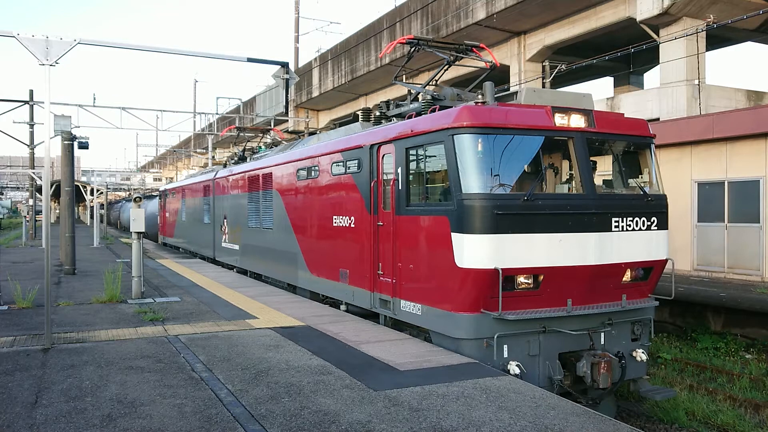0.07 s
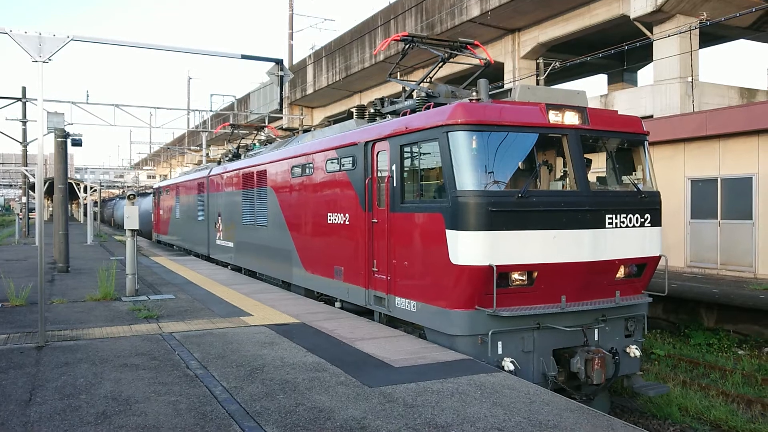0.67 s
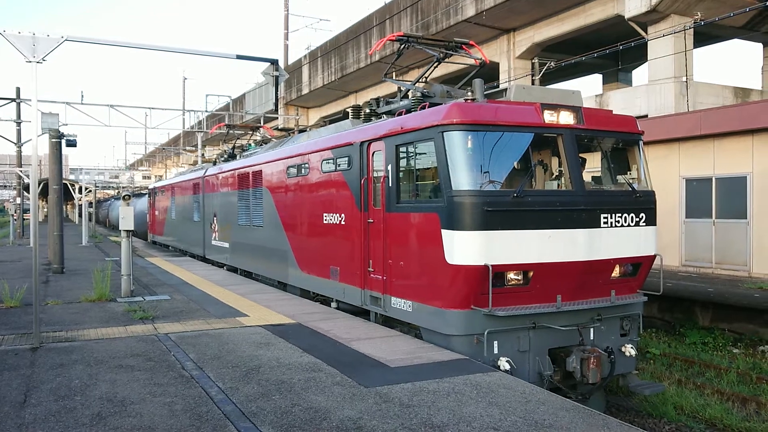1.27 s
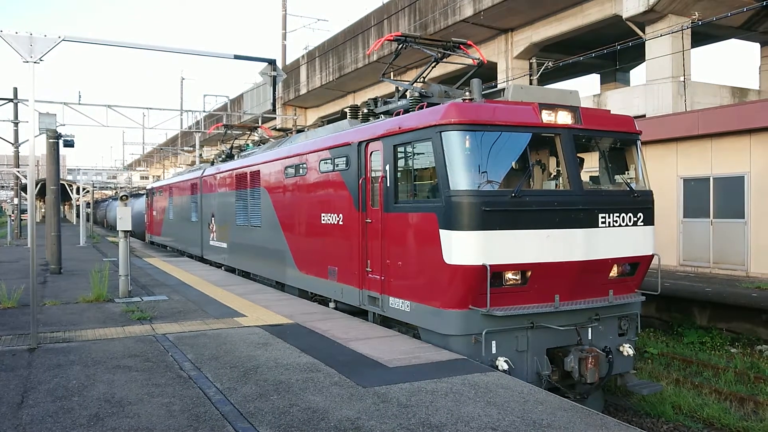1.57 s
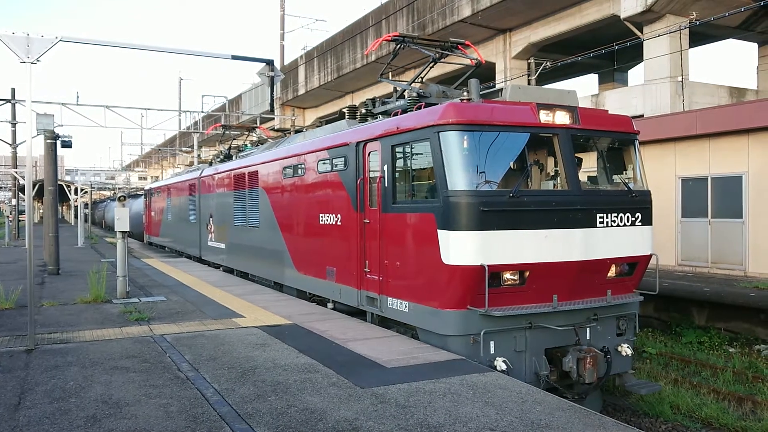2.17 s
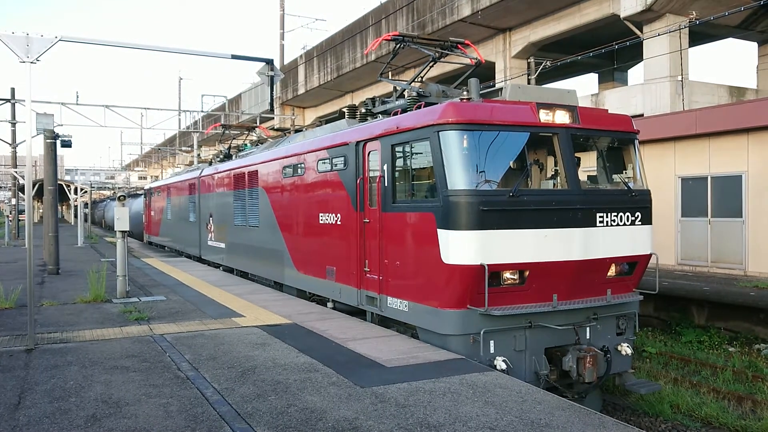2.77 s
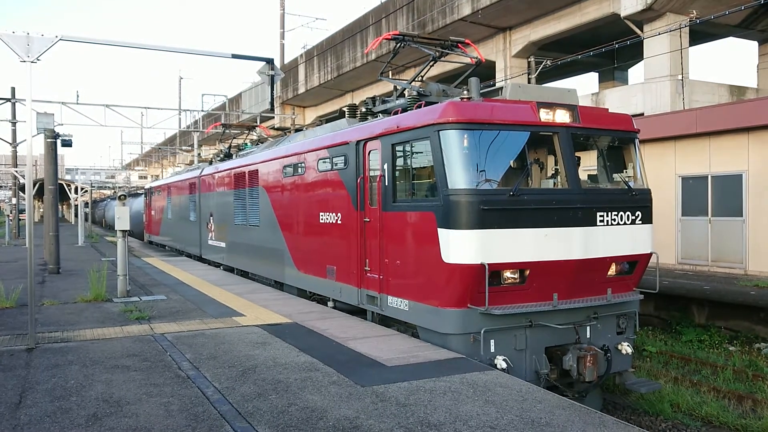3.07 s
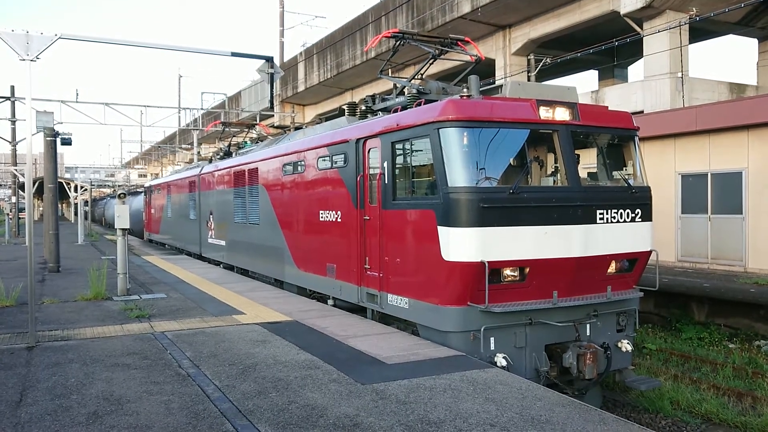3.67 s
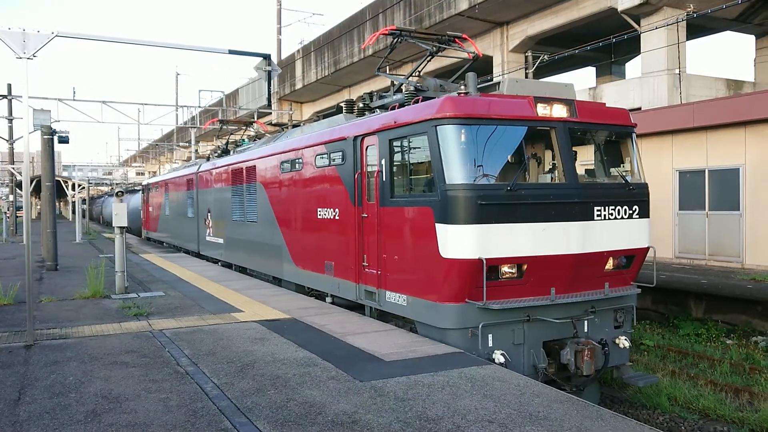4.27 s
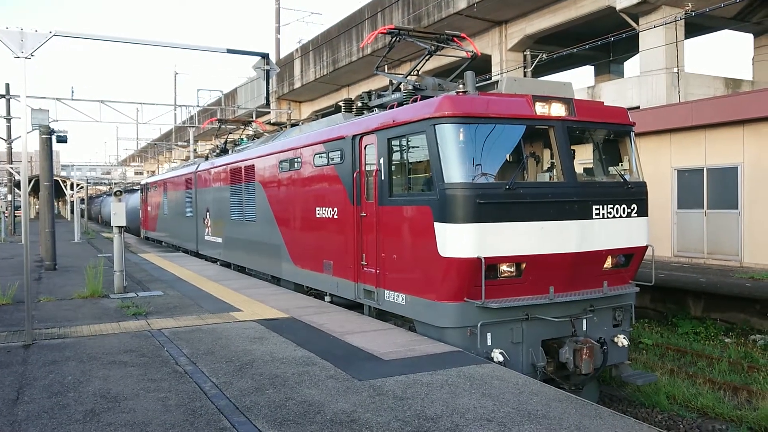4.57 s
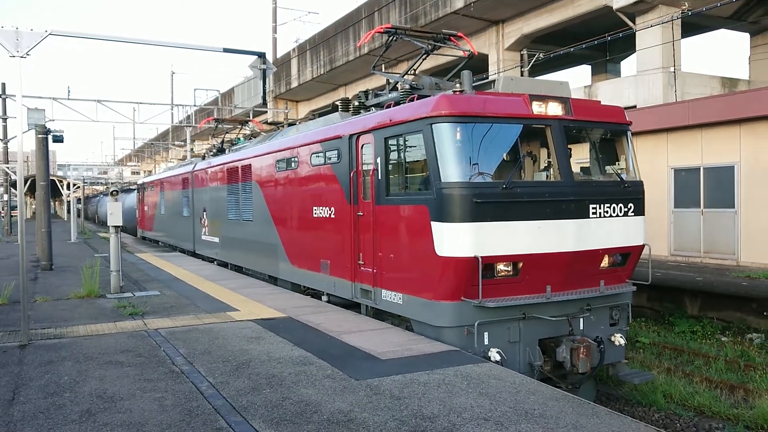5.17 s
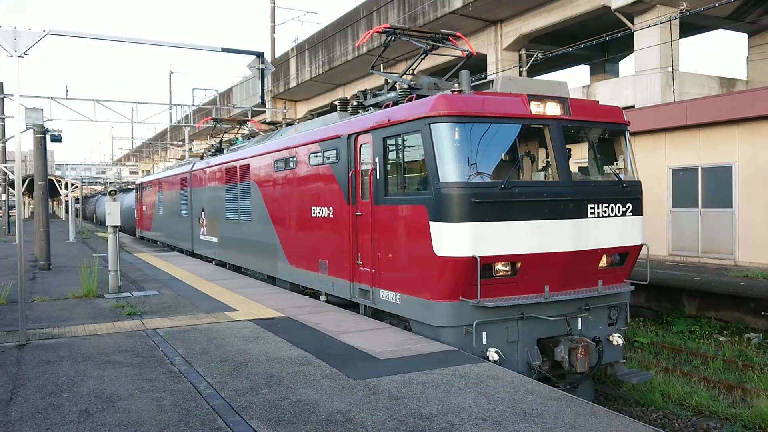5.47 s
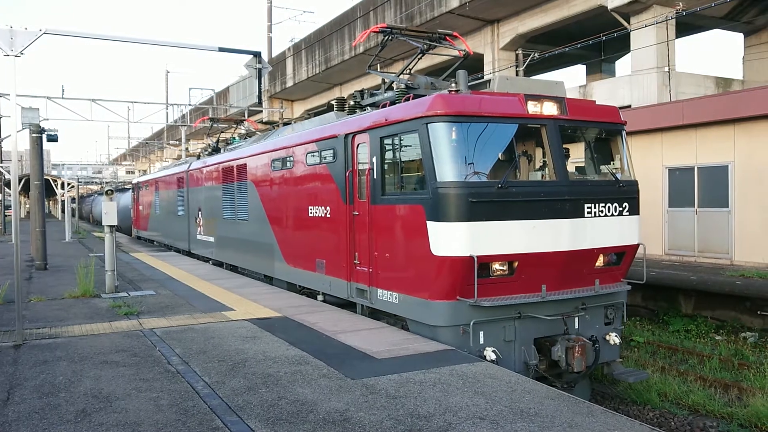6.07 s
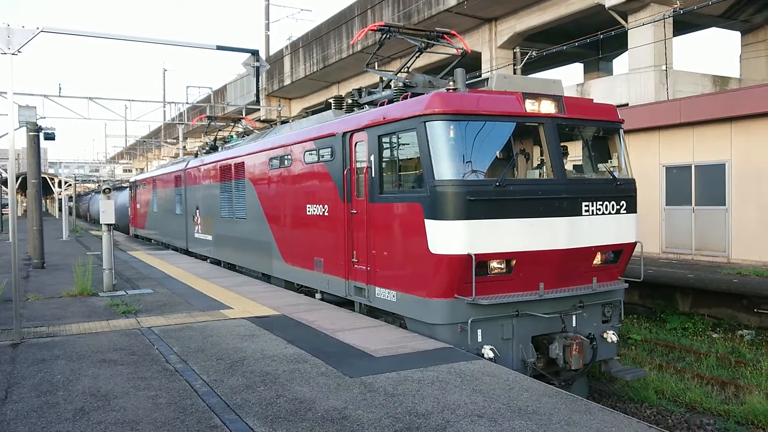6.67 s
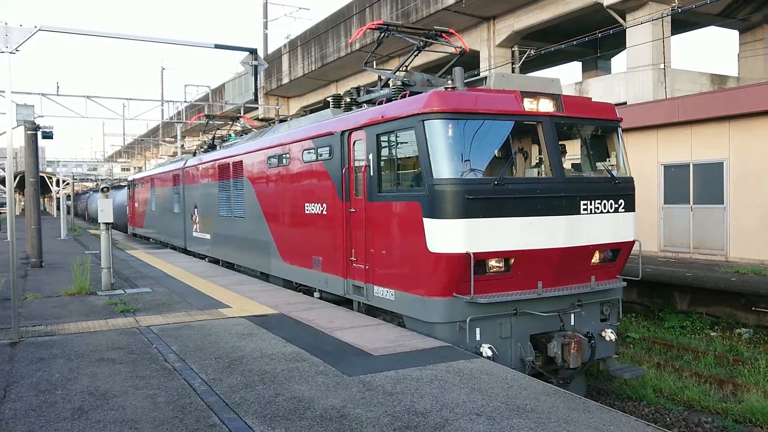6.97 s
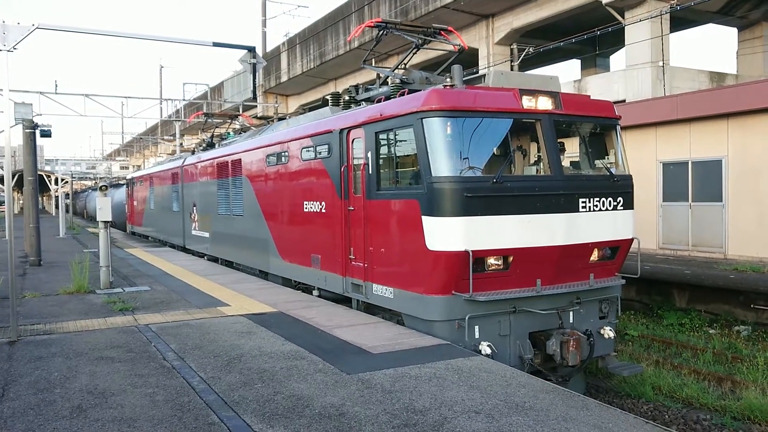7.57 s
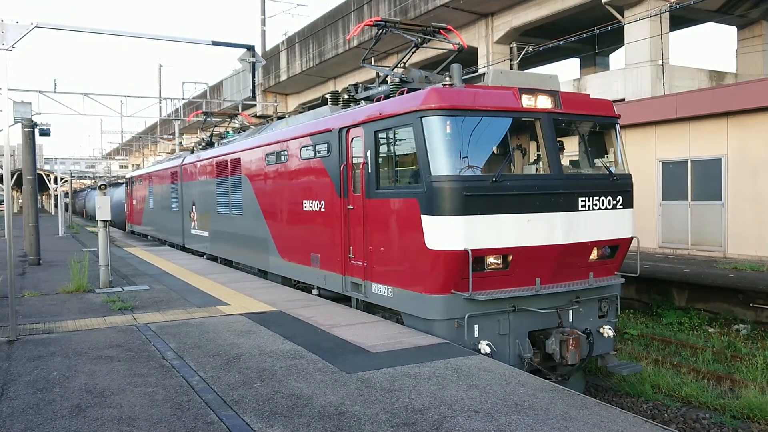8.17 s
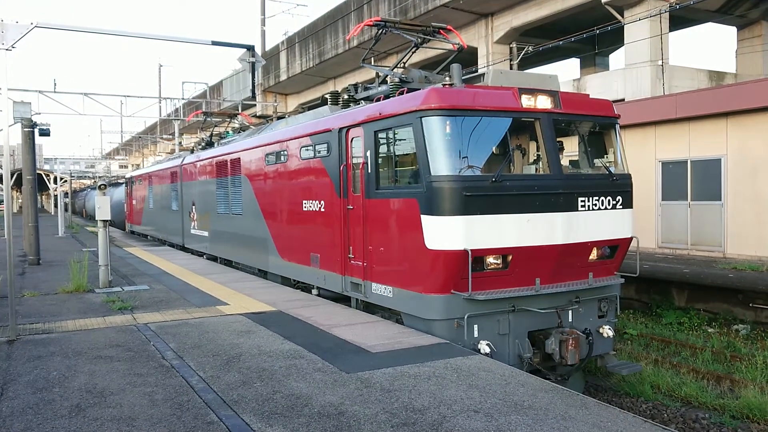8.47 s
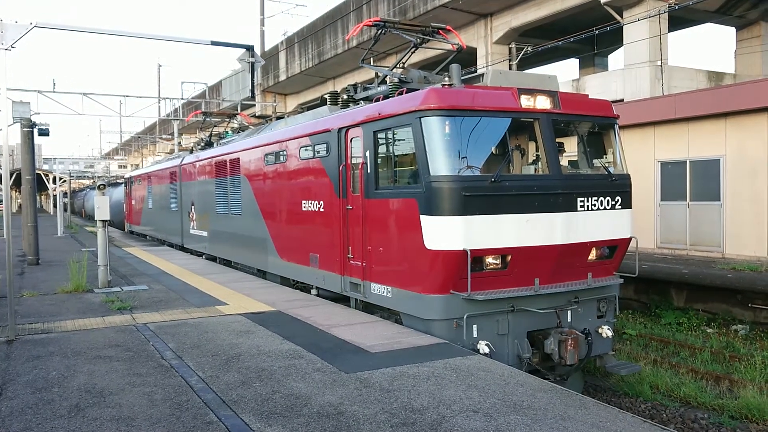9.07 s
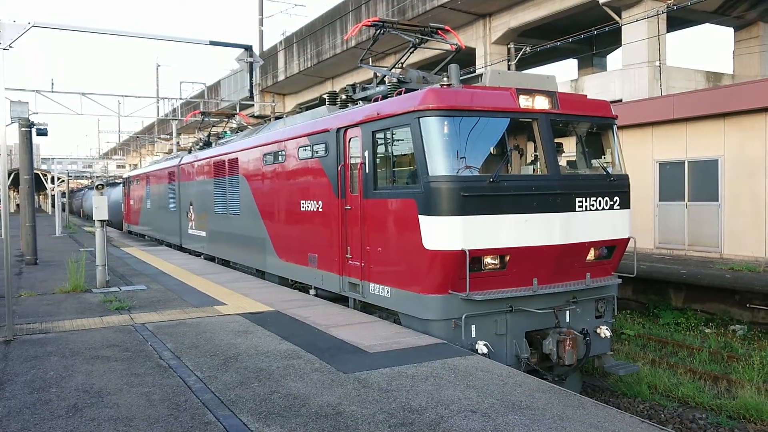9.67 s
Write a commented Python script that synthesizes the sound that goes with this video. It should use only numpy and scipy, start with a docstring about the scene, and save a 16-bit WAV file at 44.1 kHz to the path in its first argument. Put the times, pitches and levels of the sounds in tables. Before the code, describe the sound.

Heard from close by on a station platform, a stationary electric locomotive gives a low rumble and a slowly beating fan hum, with faint crickets in the grass. Then a thin high whine comes on, a relay ticks lightly, and two blowers wind up in overlapping rising tones over a motor growl. The rush of air swells until the tones fade into a loud, even roar.

```python
"""Electric locomotive starting its blowers

It stands at a platform, rumbling, its cooling fans beating; crickets scrape their wings in the grass.
An inverter switches on with a thin whine, a relay ticks and two blowers spin up one behind the other.
Their blade tones climb through housing and duct resonances, then sink into a broad roar of air."""
import sys
import numpy as np
from scipy import signal
from scipy.fft import rfft, irfft, next_fast_len
from scipy.io import wavfile

SR = 44100
rng = np.random.default_rng(int(sys.argv[2]) if len(sys.argv) > 2 else 0)


def int16_out(signal):
    """Quantize to a 16-bit WAV file."""
    q = np.round(np.clip(np.atleast_2d(signal).T, -1, 1) * 32767)
    wavfile.write(sys.argv[1], SR, q.astype(np.int16))


N = 433503
T = np.arange(N) / SR
FFT_SIZE = next_fast_len(N, True)
BIN_HZ = np.maximum(np.fft.rfftfreq(FFT_SIZE, 1 / SR), 1)


def from_db(db):
    """Decibels to gain."""
    return 10 ** (np.asarray(db) / 20)


def unit_power(x):
    """Scale to an RMS of 1."""
    return x / np.sqrt(np.mean(x ** 2) + 1e-20)


def pan(pan_db):
    """Left and right gains; pan_db is left minus right."""
    return from_db([[pan_db / 2], [-pan_db / 2]])


def in_time(rows):
    """Table columns, interpolated per sample."""
    times_s, *columns = np.transpose(rows)
    return [np.interp(T, times_s, column) for column in columns]


def at_hz(rows, hz):
    """Table columns, interpolated over log frequency."""
    points_hz, *columns = np.transpose(rows)
    return [np.interp(np.log(hz), np.log(points_hz), column) for column in columns]


def fade_in(start_s, rise_s):
    """Linear rise from 0 to 1."""
    return np.clip((T - start_s) / rise_s, 0, 1)


def swell(middle_s, width_s):
    """Bell-shaped gain, peak 1."""
    return np.exp(-((T - middle_s) / width_s) ** 2)


def resonance(hz, centre_hz, width_hz):
    """Steep-sided resonance gain, peak 1."""
    return 1 / (1 + ((hz ** 2 - centre_hz ** 2) / (hz * width_hz)) ** 2)


def drift(corner_hz):
    """Slow random wander, RMS 1."""
    hop, settle = 40, 2000
    pole = np.exp(-2 * np.pi * corner_hz * hop / SR)
    noise = rng.standard_normal(N // hop + settle + 2)
    slow = signal.lfilter([1], [1, -2 * pole, pole * pole], noise)[settle:]
    return np.interp(np.arange(N) / hop, np.arange(len(slow)), unit_power(slow))


def shaped_noise(spectrum, image, lead_ms=0):
    """Stereo noise, left earlier by lead_ms; the channel mean has unit power."""
    density_db, = at_hz(spectrum, BIN_HZ)
    coherence, pan_db = at_hz(image, BIN_HZ)
    lag_rad = 2 * np.pi * BIN_HZ * lead_ms / 1000
    shared, own = rfft(rng.standard_normal((2, FFT_SIZE)))
    partly_shared = coherence * np.exp(-1j * lag_rad) * shared + np.sqrt(1 - coherence ** 2) * own
    left_gain, right_gain = from_db(pan_db / 2), from_db(-pan_db / 2)
    pair = np.array([left_gain * shared, right_gain * partly_shared])
    sum_gain = np.sqrt(left_gain ** 2 + right_gain ** 2 + 2 * coherence * np.cos(lag_rad))
    out = irfft(pair * from_db(density_db) / sum_gain, FFT_SIZE)[:, :N]
    return out / np.std(out.mean(axis=0))


def tone(hz, image, lead_ms, scatter, flutter_hz):
    """Stereo tone; turbulence and reflections scatter a share of its power."""
    phase = 2 * np.pi * np.cumsum(hz + np.zeros(N)) / SR
    phases = np.array([phase, phase - 2 * np.pi * hz * lead_ms / 1000])
    coherence, pan_db = at_hz(image, np.mean(hz))
    shared, own = [(drift(flutter_hz) + 1j * drift(flutter_hz)) / np.sqrt(2) for _ in range(2)]
    flutter = np.array([shared, coherence * shared + np.sqrt(1 - coherence ** 2) * own])
    sway = np.sqrt(1 - scatter) + np.sqrt(scatter) * flutter
    return np.sqrt(2) * (sway.real * np.cos(phases) - sway.imag * np.sin(phases)) * pan(pan_db)


# Stereo image at idle: freq_hz, coherence, pan_db
IDLE_IMAGE = [(70, 0.97, 2.5), (285, 1, 1.7), (550, 0.72, 1.5), (980, 1, 0), (1500, 0.13, -3.5),
              (2420, 0.8, -5), (3020, 0.26, 0.5), (3980, 1, 7), (5500, 0, 4), (7460, 0, -1.5),
              (9900, 0.15, 6.5), (12200, .05, -1.5), (14350, .05, -47)]
# Machinery rumble and grille hiss spectra: freq_hz, relative_db
RUMBLE = [(15, -65), (28, -37), (37, -23), (48, -7), (62, 4), (90, -2), (115, -4.5), (155, -7), (240, -3.5),
          (320, -8), (400, -12), (470, -17), (600, -67), (1000, -90)]
GRILLE_HISS = [(200, -48), (400, -25), (520, -2), (770, 2.5), (920, -1.5), (1150, -4.5), (1600, -7),
               (2350, -9.5), (3000, -15.5), (4400, -17.5), (6100, -23.5), (8600, -23), (10600, -33),
               (15000, -44.5)]
# Motor and body panel hum: pitch_hz, flutter_hz, level_db
HUM = [(187.2, 14, -46.5), (239.4, 11, -49.5), (354.5, 4.3, -61.5), (766, 12, -62), (1560, 55, -54.5),
       (2393, 2.6, -63)]
# Slow chance swells of the rumble near 66 Hz: time_s, pitch_hz, relative_db
RUMBLE_SWELLS = [(0.95, 66.8, -42), (1.2, 64.6, -35), (1.35, 65.3, -47), (1.65, 66.2, -48),
                 (1.85, 66.66, -36.5), (2.1, 66.6, -42), (2.45, 67.6, -36.5), (3.3, 64.7, -44),
                 (3.85, 64.3, -32), (4.7, 66.3, -43.5), (5.05, 66.4, -33.5), (5.35, 65.4, -56),
                 (6.25, 65.5, -38.5), (6.55, 66.4, -45), (6.8, 66.2, -29), (7.0, 65.5, -37.5),
                 (7.18, 66.6, -29.5), (7.4, 66.7, -43), (7.7, 69.1, -49), (8.0, 68.1, -32.5),
                 (8.6, 68.5, -41)]


def idling_machinery(lead_ms=-0.13, rumble_db=-35, hiss_db=-44, swell_trim_db=0.5):
    """Machinery rumbles with slow irregular swells, grilles hiss, motors and panels hum."""
    rumble = from_db(rumble_db) * shaped_noise(RUMBLE, IDLE_IMAGE, lead_ms)
    hiss = from_db(hiss_db + 0.21 * drift(3.4)) * shaped_noise(GRILLE_HISS, IDLE_IMAGE, lead_ms)
    hum = sum(from_db(db) * tone(hz, IDLE_IMAGE, lead_ms, scatter=0.84, flutter_hz=flutter_hz)
              for hz, flutter_hz, db in HUM)
    hz, db = in_time(RUMBLE_SWELLS)
    swells = from_db(swell_trim_db + db) * tone(hz, IDLE_IMAGE, lead_ms, scatter=0.2, flutter_hz=4.5)
    return rumble + hiss + hum + swells


# Cooling fan partials: pitch_hz, level_db, twin_relative_db, dip_s
FAN_PARTIALS = [(508.5, -49, -5, 2.8), (1017, -49.8, -2.3, 3.07)]


def beating_fans(lead_ms=-0.25, beat_hz=1.92):
    """Two fans at almost the same speed reinforce and partly cancel in turn."""
    arrival_s = np.array([T, T - lead_ms / 1000])
    out = 0
    for hz, db, twin_db, dip_s in FAN_PARTIALS:
        phase = 2 * np.pi * hz * arrival_s + 0.08 * drift(3)
        twin = from_db(twin_db) * np.sin(phase + 2 * np.pi * beat_hz * (T - dip_s))
        out += np.sqrt(2) * from_db(db + 0.5 * drift(1)) * (np.sin(phase) - twin)
    return out


def wing_strokes(hz, fall_hz, strokes_per_s, duty):
    """Each wing closure gives a short falling whistle."""
    cycle = (strokes_per_s * T + rng.random() + 0.05 * drift(2)) % 1
    stroke = np.minimum(cycle / duty, 1)
    pitch_hz = hz + fall_hz * (0.5 - stroke) + 25 * drift(40.64)
    return unit_power(np.sin(np.pi * stroke) * np.sin(2 * np.pi * np.cumsum(pitch_hz) / SR))


def station_echoes(direct, wet_db=-4, t60_s=0.28):
    """Direct sound plus scatter from viaduct and walls."""
    t = np.arange(SR // 2) / SR
    tail = rng.standard_normal((2, len(t))) * from_db(-60 * t / t60_s)
    tail /= np.linalg.norm(tail, axis=1, keepdims=True)
    return direct + from_db(wet_db) * signal.fftconvolve(direct, tail, axes=1)[:, :N]


# Chirping crickets: pitch_hz, fall_hz, level_db, pan_db
CHIRPERS = [(4070, 480, -57, 3.5), (3706, 300, -61.5, 8)]
# Their rhythms: strokes_per_s, chirps_per_s, chirp_middle_s
CHIRP_RHYTHMS = [(48.7, 4.4, 1.17), (45.25, 4.1, 1.04)]
# Their effort: time_s, gain_db
CHIRP_EFFORT = [(1, -1.5), (3, -3), (4, -0.5), (5.4, -2), (6.7, 0.5), (8, -4)]
# Trilling crickets: pitch_hz, fall_hz, strokes_per_s, level_db
TRILLERS = [(7100, 800, 11.85, -64), (7190, 800, 13.04, -64.5)]
# Distant insect spectrum: freq_hz, relative_db
CHORUS = [(2500, -58), (3400, -11.5), (3720, 0.5), (4100, 0), (4300, -52), (4600, -10.5), (5050, -3),
          (5450, -7), (5900, -18), (6500, -14), (6900, -4), (7350, -5.5), (7800, -14.5), (9000, -60)]


def crickets(chorus_db=-53):
    """Two near crickets chirp and two trill over a distant chorus."""
    near = np.zeros((2, N))
    effort_db, = in_time(CHIRP_EFFORT)
    for (hz, fall_hz, db, pan_db), rhythm in zip(CHIRPERS, CHIRP_RHYTHMS):
        strokes_per_s, chirps_per_s, middle_s = rhythm
        gate = np.clip(0.5 + 2 * np.cos(2 * np.pi * chirps_per_s * (T - middle_s)), 0, 1)
        strokes = wing_strokes(hz, fall_hz, strokes_per_s, duty=0.6)
        near += from_db(db + effort_db) * gate * strokes * pan(pan_db)
    for (hz, fall_hz, strokes_per_s, db), right_lag_samples in zip(TRILLERS, (1, 0)):
        trill = from_db(db) * wing_strokes(hz, fall_hz, strokes_per_s, duty=0.55)
        near += [trill, np.roll(trill, right_lag_samples)]
    return station_echoes(near) + from_db(chorus_db) * shaped_noise(CHORUS, IDLE_IMAGE)


# Inverter whine, on multiples of 120 Hz: pitch_hz, switch_on_db, full_drive_db
WHINE = [(2520, -63, -62.5), (5280, -67.5, -67), (5400, -64.5, -58.5), (5520, -66, -71), (7920, -78, -77),
         (8040, -81, -80), (8280, -82, -81)]


def inverter(on_s=5.17, ripple_hz=360, ripple_db=-41.5, ease_db=12):
    """The switched supply makes windings whine and hum; the hum eases as the blowers near top speed."""
    drive = fade_in(on_s, rise_s=1.61)
    whine = 0
    for hz, on_db, full_db in WHINE:
        gain = from_db(on_db + (full_db - on_db) * drive)
        whine += gain * tone(hz, IDLE_IMAGE, lead_ms=0, scatter=0.14, flutter_hz=5.4)
    ripple = tone(ripple_hz, IDLE_IMAGE, lead_ms=0, scatter=0.12, flutter_hz=6)
    hum = from_db(ripple_db - ease_db * fade_in(7.45, rise_s=0.43)) * ripple
    return fade_in(on_s, rise_s=0.15) * (whine + hum)


RAMP_START_S, BLOWER_FADE_S = 5.25, 0.069
BLADES, TOP_HZ = 20, 1425
# Spin-up, one curve per blower: time_s, blade_hz
SPIN_UP = [
    [(RAMP_START_S, 185), (5.35, 215), (5.43, 295), (5.55, 343), (5.7, 374), (5.82, 405), (6.09, 499),
     (6.42, 612), (6.57, 665), (6.8, 728), (7.18, 872), (7.7, 1070), (8.25, 1310), (8.53, TOP_HZ)],
    [(5.5, 226), (6.38, 499), (7.0, 686), (7.25, 768), (7.5, 872), (7.61, 918), (7.8, 988), (7.95, 1066),
     (8.45, 1265), (8.8, TOP_HZ)],
]


def blade_hz(blower):
    """Blade-passing rate of blower 0 or 1."""
    return in_time(SPIN_UP[blower])[0]


def sinking(hz, from_hz=1404, depth_db=18):
    """Gain that sinks a blower's tones just under top speed."""
    return from_db(-depth_db * np.clip((hz - from_hz) / (TOP_HZ - from_hz), 0, 1))


# Stereo image of the blowers: freq_hz, coherence, pan_db
BLOWER_IMAGE = [(70, 0.99, 3), (302, 1, 0.5), (520, 0.93, 0.5), (865, 1, -0.5), (1210, 0.93, -2),
                (1690, 0.59, -6.5), (2360, 0.29, -5), (3100, 0.7, 1), (4080, 0.15, 9.5), (5540, 0.13, 4),
                (7500, 0.12, -5), (10000, 0.064, 7.5), (11700, .1, 2), (13000, .05, -11), (14500, .05, -20)]
# Housing resonances: centre_hz, width_hz, first_blower_db, second_blower_db
HOUSING_MODES = [(195, 40, -38, -60), (298, 44, -33.5, -50), (346, 44, -29, -44), (385, 40, -36.5, -48),
                 (612, 24, -44, -50), (665, 36, -38.5, -46), (690, 50, -42, -38.5), (727, 24, -37, -48),
                 (772, 65, -39.5, -43), (830, 45, -44, -37), (874, 40, -33.5, -29.5), (918, 32, -48, -30),
                 (980, 80, -44, -36.5), (1064, 60, -51, -37), (1160, 90, -50, -42), (1315, 120, -39, -46)]
# Side tones from uneven blades: offset_shaft_orders, relative_db
SIDE_TONES = [(-5, -18), (-2, -15), (-1, -14), (1, -14), (2, -14), (5, -22)]
# Buzzing panels: blade_tone_multiple, panel_hz, width_hz, first_blower_db, second_blower_db
PANELS = [(2, 700, 110, -47, -58), (1.42, 790, 220, -48, -62), (3, 1085, 170, -46, -60),
          (1.5, 1398, 50, -56, -42), (1.25, 1235, 40, -58, -45), (1.5, 1630, 160, -51, -52),
          (2, 2090, 200, -50, -49)]


def blower_tones(lead_ms=0.13, waver_share=0.007, skirt_db=-15.5):
    """Blade tones waver in unsteady air, swell at housing resonances and set panels buzzing."""
    def rough_tone(hz, scatter, flutter_hz):
        return tone(hz, BLOWER_IMAGE, lead_ms, scatter, flutter_hz)

    out = 0
    for blower, curve in enumerate(SPIN_UP):
        start_s, hz = curve[0][0], blade_hz(blower)
        wavering_hz = hz * (1 + waver_share * drift(14))
        housing_power = sum((from_db(db[blower]) * resonance(hz, centre_hz, width_hz)) ** 2
                            for centre_hz, width_hz, *db in HOUSING_MODES)
        blades = rough_tone(wavering_hz, scatter=0.38, flutter_hz=25.67)
        for order, db in SIDE_TONES:
            side_hz = wavering_hz * (1 + order / BLADES)
            blades += from_db(db) * rough_tone(side_hz, scatter=0.81, flutter_hz=21)
        buzz = 0
        for multiple, panel_hz, width_hz, *db in PANELS:
            gain = from_db(db[blower]) * resonance(multiple * hz, panel_hz, width_hz)
            buzz += gain * rough_tone(panel_hz, scatter=0.85, flutter_hz=32)
        tip_eddies = from_db(skirt_db) * rough_tone(hz, scatter=0.54, flutter_hz=70.4)
        envelope = fade_in(start_s, BLOWER_FADE_S) * sinking(hz)
        out += envelope * (np.sqrt(housing_power) * (blades + tip_eddies) + buzz)
    return out


# Motor growl, about two octaves under the blade tone: time_s, pitch_hz
GROWL_PITCH = [(5.25, 50), (7.0, 180), (7.4, 212), (8.0, 291), (8.2, 320), (8.53, 356)]


def blower_motor(lead_ms=0.04, growl_db=-34, shaft_top_db=-29.5, standstill_loss_db=57):
    """The first blower's motor growls through a body resonance; its shaft throbs once a turn."""
    hz = blade_hz(0)
    growl_hz, = in_time(GROWL_PITCH)
    growl_gain = from_db(growl_db) * sinking(hz) * resonance(growl_hz, centre_hz=315, width_hz=270)
    growl = growl_gain * tone(growl_hz, BLOWER_IMAGE, lead_ms, scatter=0.41, flutter_hz=15)
    shaft_gain = from_db(shaft_top_db - standstill_loss_db * (1 - hz / TOP_HZ))
    shaft = shaft_gain * tone(hz / BLADES, BLOWER_IMAGE, lead_ms, scatter=0.39, flutter_hz=3.2)
    return fade_in(RAMP_START_S, BLOWER_FADE_S) * (growl + shaft)


# Spectra of duct roar, outlet rush, outlet jet and the roar's low mids: freq_hz, relative_db
ROAR = [(15, -60), (28, -42), (37, -14), (46, -13.5), (70, -1.5), (90, -5), (130, -3.5), (200, -9.5),
        (290, -10), (360, -14), (400, -22.5), (460, -26.5), (600, -48), (1000, -90)]
RUSH = [(250, -50), (450, -20), (560, -7), (680, 0), (880, 0.5), (1150, -5.5), (1600, -2.5), (2100, -9.5),
        (2800, -17.5), (3600, -19.5), (6000, -80)]
JET = [(1650, -13), (2800, -13), (3550, -5.5), (3870, 1), (4310, 4), (4690, 1.5), (5080, 2), (6430, -7.5),
       (8510, -4.5), (12200, -17.5), (14700, -12.5), (15600, -15)]
ROAR_LOW_MIDS = [(130, -33), (185, 1), (270, -1), (355, -1), (400, -9), (460, -37), (1000, -90)]
# Roar, rush and jet against speed: top_db, standstill_loss_db, exponent, gust_db, first_blower_share
AIR_LAWS = [(-23.5, 30, 0.78, -54, 0.94), (-36, 34.5, 1.52, -53.5, 0.22), (-43, 38.5, 0.95, -65, 0.8)]
# Roar level wander near top speed: time_s, gain_db
ROAR_WANDER = [(7.5, -1), (7.75, -1), (7.96, 1.5), (8.07, -1), (8.25, 2), (8.5, 0), (8.73, -1.5), (9.07, 1),
               (9.2, -1), (9.45, 0.5), (9.8, 0.5)]


def blower_air(lead_ms=0.13, low_mid_db=-28.5, flicker_db=0.52):
    """A starting gust, then air noise that grows with speed; the roar's low mids swell briefly."""
    gust = swell(middle_s=5.6, width_s=0.37)
    low_mid_gain = from_db(low_mid_db) * swell(middle_s=9.62, width_s=0.17)
    out = low_mid_gain * shaped_noise(ROAR_LOW_MIDS, BLOWER_IMAGE, lead_ms)
    roar_wander_db, = in_time(ROAR_WANDER)
    for spectrum, wander_db, law in zip((ROAR, RUSH, JET), (roar_wander_db, 0, 0), AIR_LAWS):
        top_db, loss_db, exponent, gust_db, share = law
        speed = (share * blade_hz(0) + (1 - share) * blade_hz(1)) / TOP_HZ
        flow_db = top_db - loss_db * np.maximum(1 - speed, 0) ** exponent
        gain = from_db(flow_db + wander_db) + from_db(gust_db) * gust
        out += gain * shaped_noise(spectrum, BLOWER_IMAGE, lead_ms)
    return fade_in(RAMP_START_S, BLOWER_FADE_S) * from_db(flicker_db * drift(23)) * out


# Relay ticks: start_s, relative_db
RELAY_TICKS = [(5.4198, -43), (5.423, -29)]


def relay(highpass_hz=7000, decay_s=0.00035, gain=0.5):
    """A tiny bright double tick as the blowers start."""
    envelope = sum(from_db(db) * (T >= start_s) * np.exp(-np.abs(T - start_s) / decay_s)
                   for start_s, db in RELAY_TICKS)
    highpass = signal.butter(2, highpass_hz, "high", fs=SR, output="sos")
    return signal.sosfilt(highpass, gain * envelope * rng.standard_normal((2, N)))


# Duct resonance crossings, one per blower: peak_db, fall_db_per_s
DUCT_CROSSINGS = [(-34.5, 60), (-37.5, 32)]


def singing_duct(pitch_hz=498.4, hum_db=-52, rise_db_per_s=168, peak_delay_s=0.051):
    """The duct sings as each blade tone crosses its resonance, then hums on in the air stream."""
    gain = from_db(hum_db) * (blade_hz(0) > pitch_hz)
    for blower, (peak_db, fall_db_per_s) in enumerate(DUCT_CROSSINGS):
        crossing_s = np.interp(pitch_hz, blade_hz(blower), T)
        since_peak_s = T - crossing_s - peak_delay_s
        below_peak_db = np.maximum(-rise_db_per_s * since_peak_s, fall_db_per_s * since_peak_s)
        gain = np.maximum(gain, from_db(peak_db - below_peak_db))
    return gain * tone(pitch_hz, BLOWER_IMAGE, lead_ms=0.044, scatter=0.51, flutter_hz=6.9)


# High hiss spectrum: freq_hz, relative_db
HIGH_HISS = [(6000, -45), (8500, -4), (10600, 4), (11700, -11), (12500, -2), (14700, -2), (15600, -12)]
# Its stereo image: freq_hz, coherence, pan_db
HIGH_HISS_IMAGE = [(10500, .1, -1), (12500, .1, -24)]


def high_hiss(level_db=-69):
    """A thin hiss, perhaps an air valve, opens abruptly on the right and stays."""
    return from_db(level_db) * fade_in(6.59, rise_s=0.029) * shaped_noise(HIGH_HISS, HIGH_HISS_IMAGE)


def scene():
    """Locomotive and trackside, heard from the platform."""
    background = idling_machinery() + beating_fans() + crickets()
    start_up = inverter() + blower_tones() + blower_motor() + blower_air() + relay()
    return background + start_up + singing_duct() + high_hiss()


def record(dry, start_s=0.906, cutoff_hz=15700):
    """Silence until start_s; steep treble cut."""
    lowpass = signal.ellip(12, 0.1, 90, cutoff_hz, fs=SR, output="sos")
    return signal.sosfilt(lowpass, dry * (T >= start_s))


dry = scene()
out = record(dry)
int16_out(out)
```